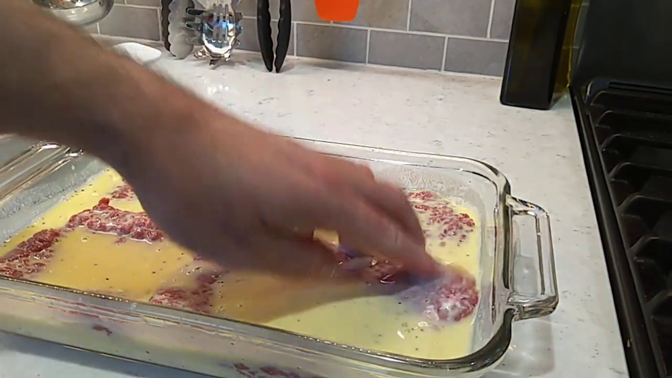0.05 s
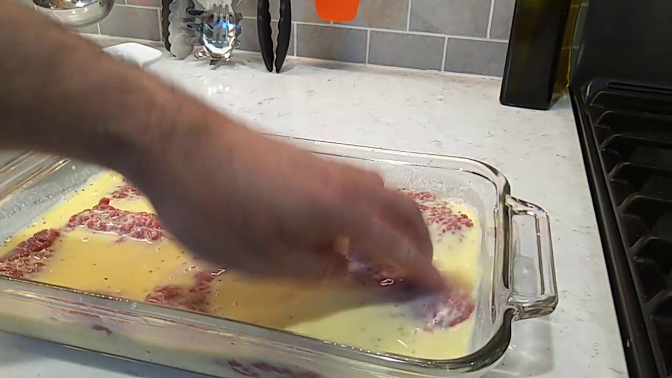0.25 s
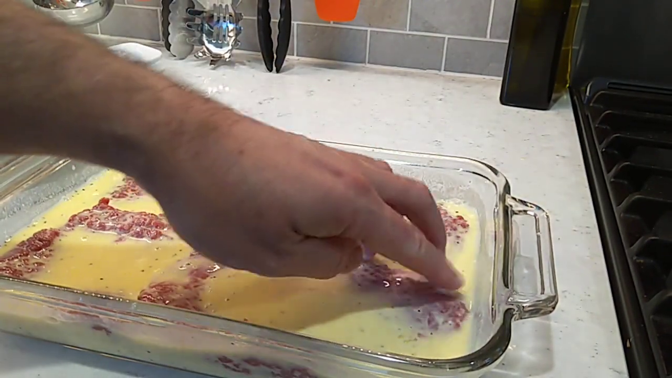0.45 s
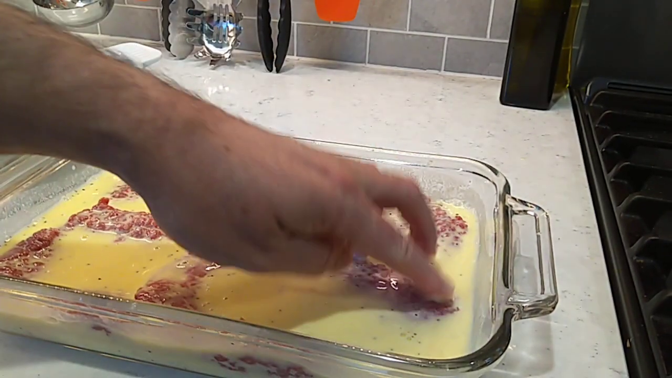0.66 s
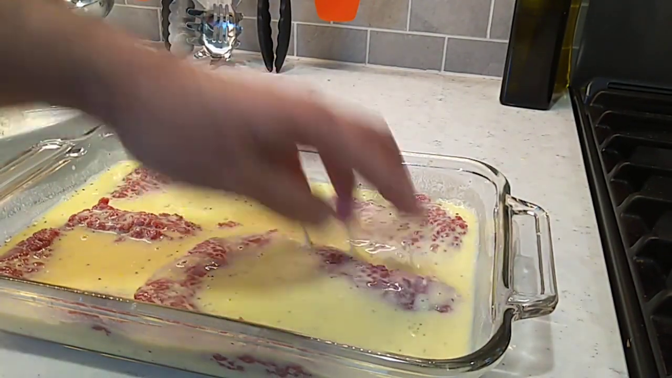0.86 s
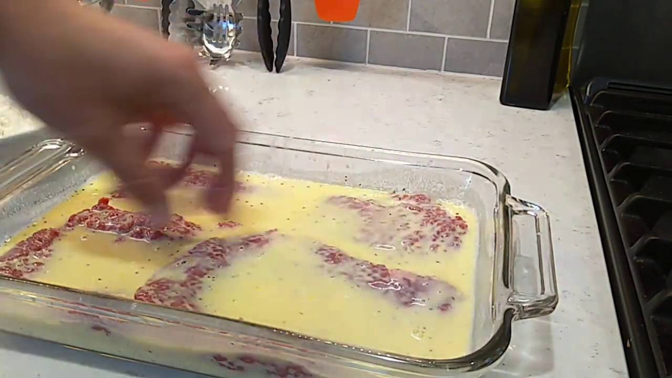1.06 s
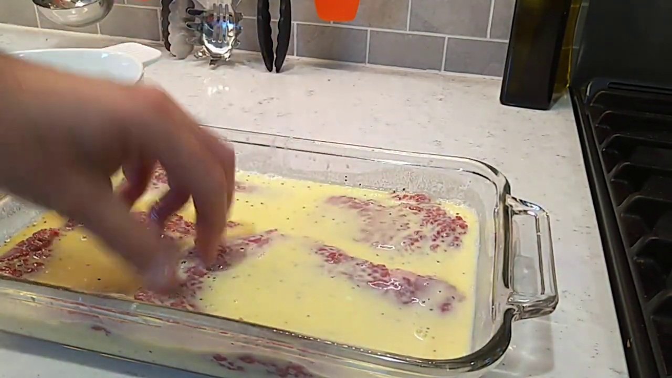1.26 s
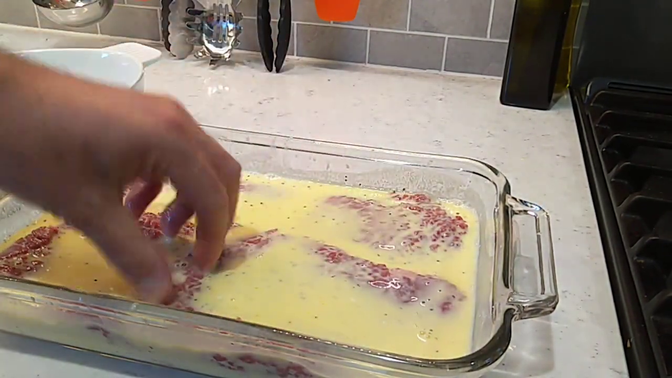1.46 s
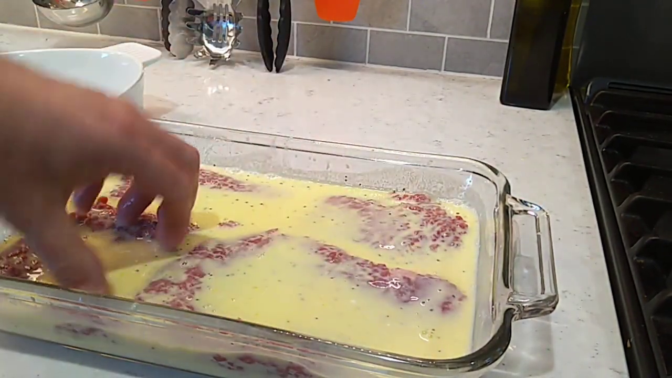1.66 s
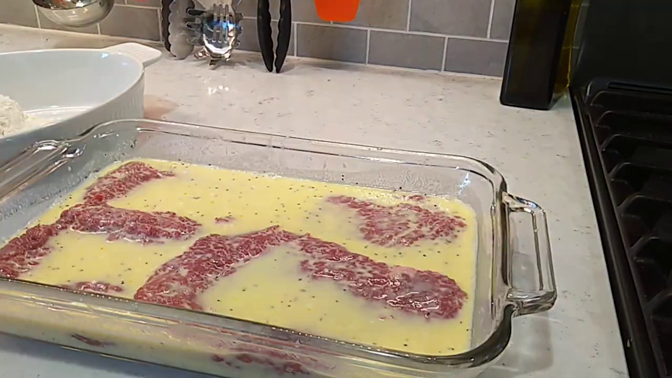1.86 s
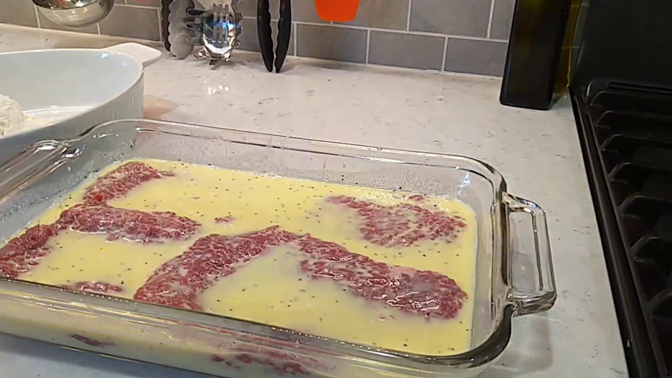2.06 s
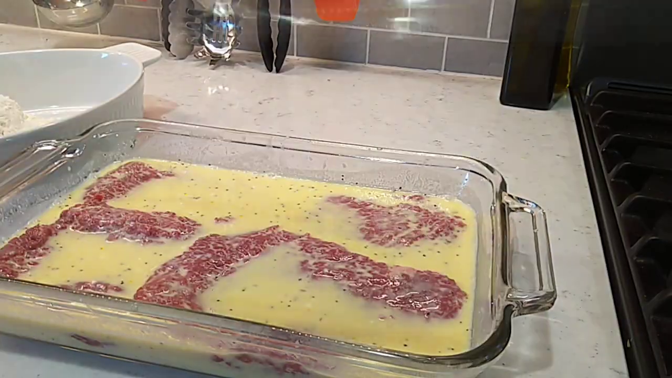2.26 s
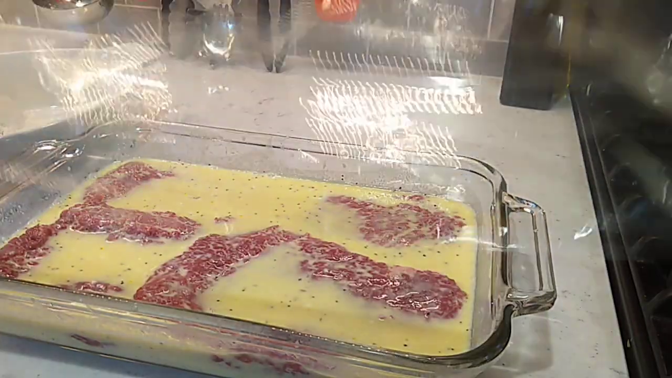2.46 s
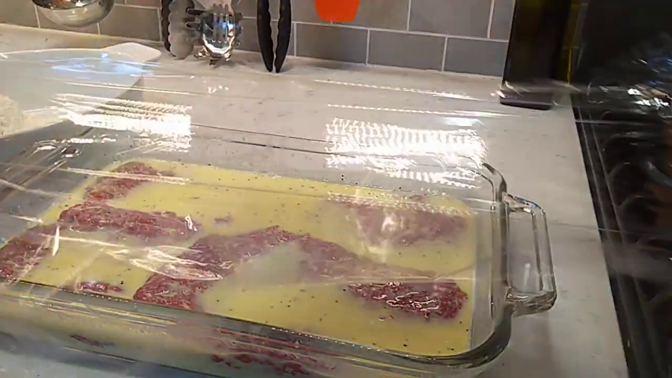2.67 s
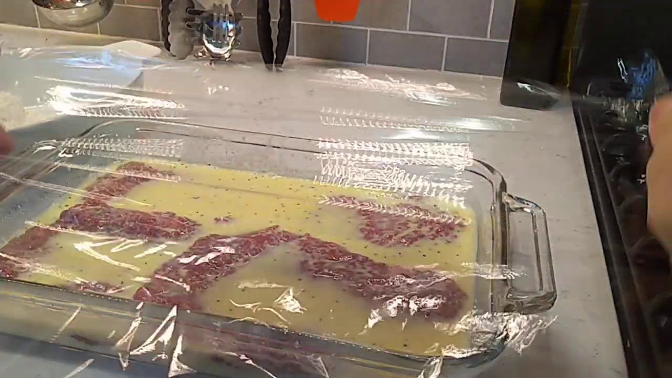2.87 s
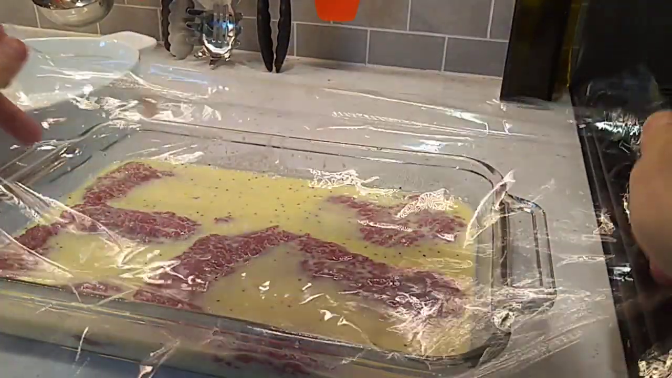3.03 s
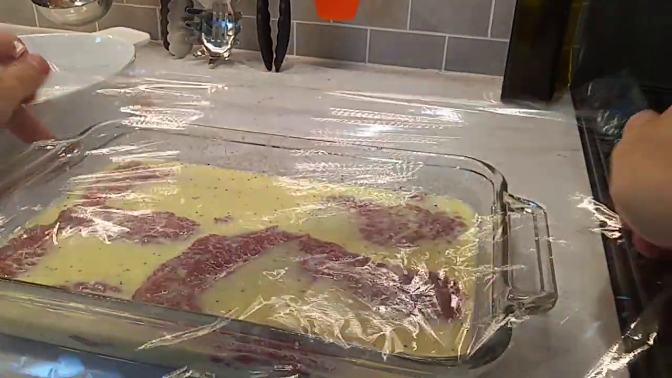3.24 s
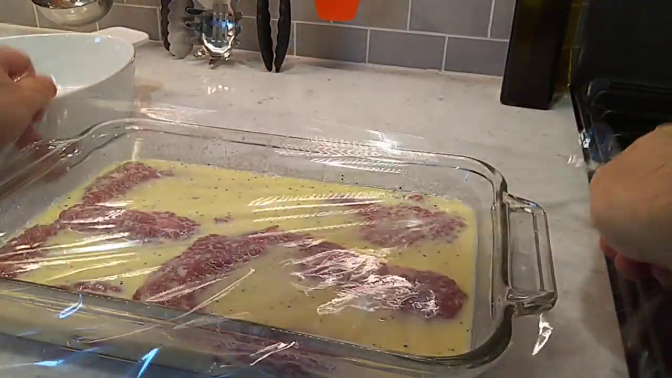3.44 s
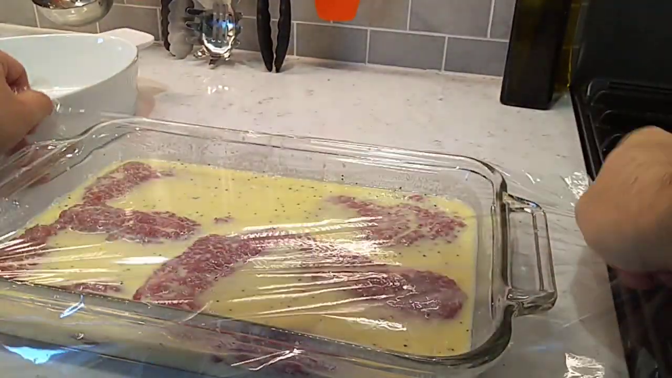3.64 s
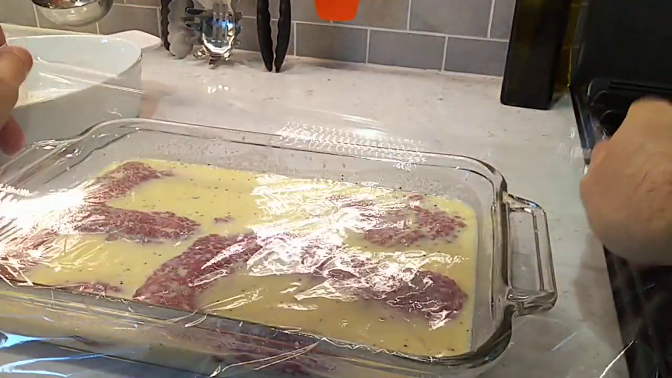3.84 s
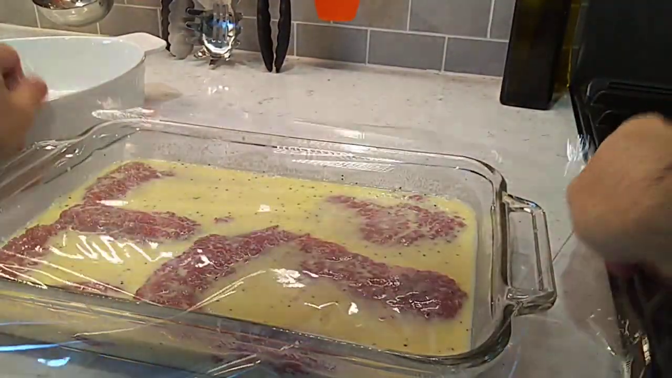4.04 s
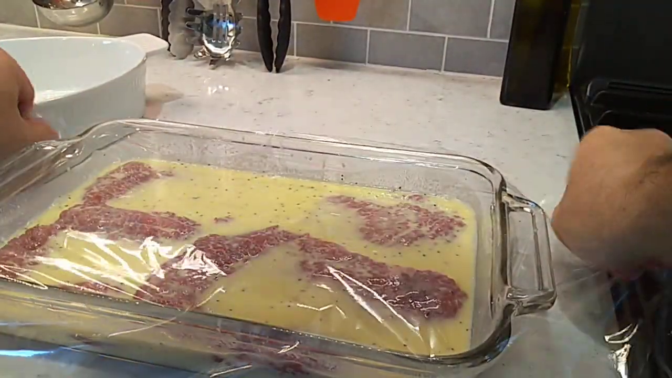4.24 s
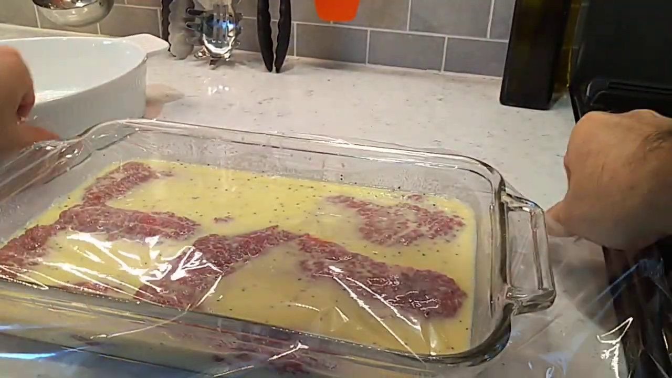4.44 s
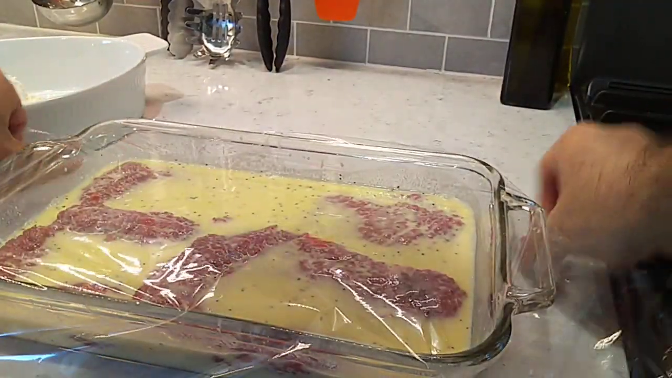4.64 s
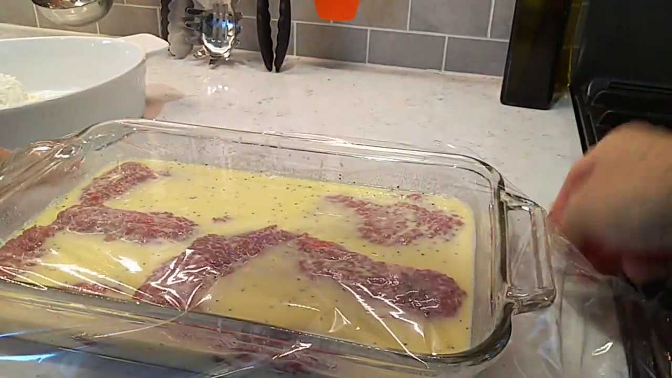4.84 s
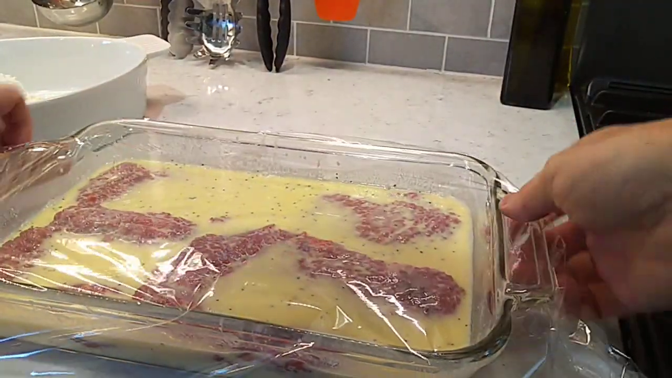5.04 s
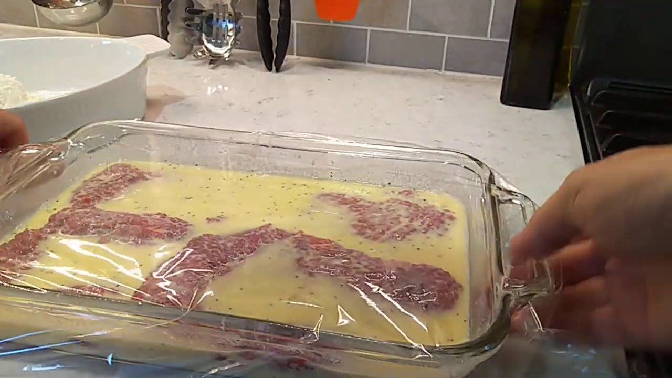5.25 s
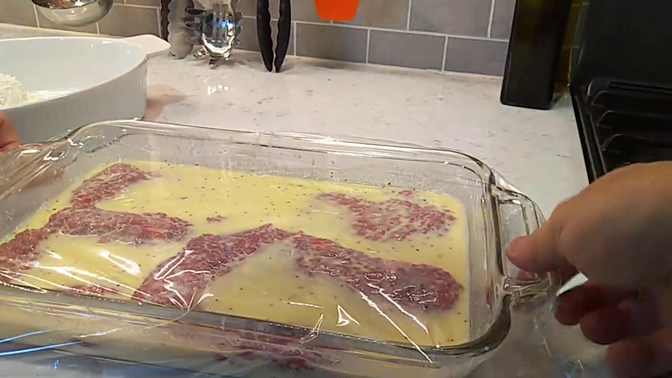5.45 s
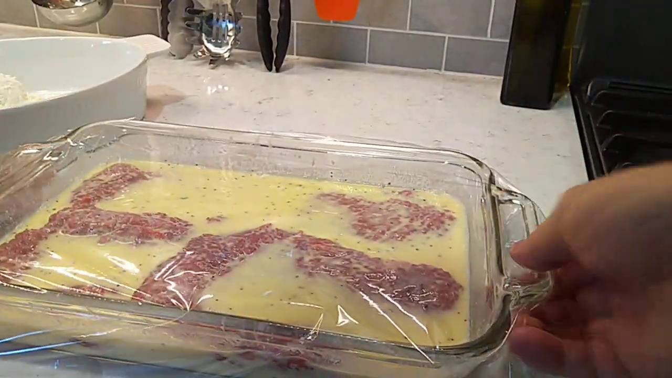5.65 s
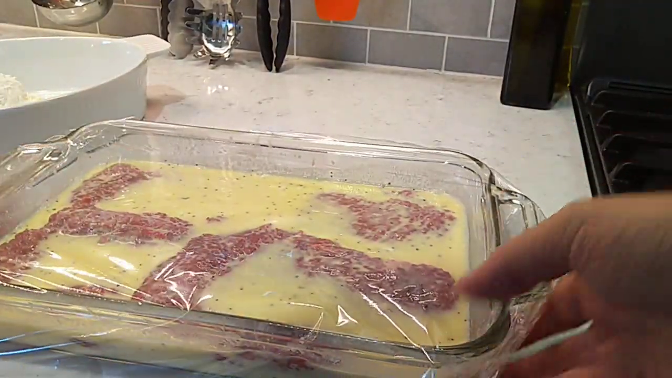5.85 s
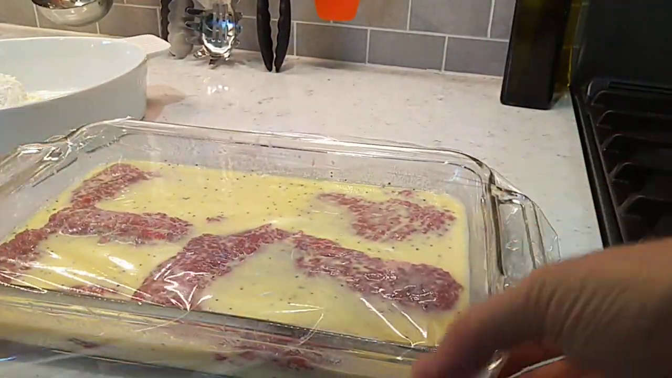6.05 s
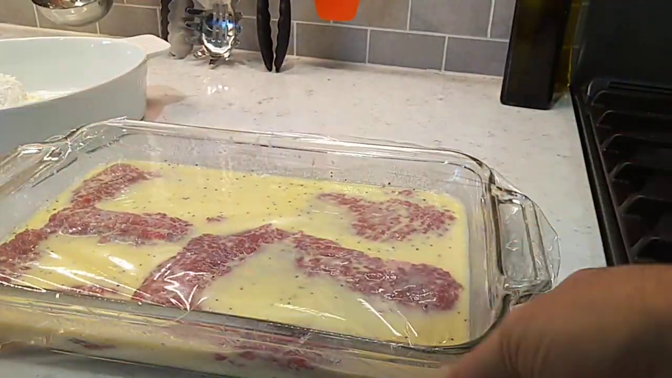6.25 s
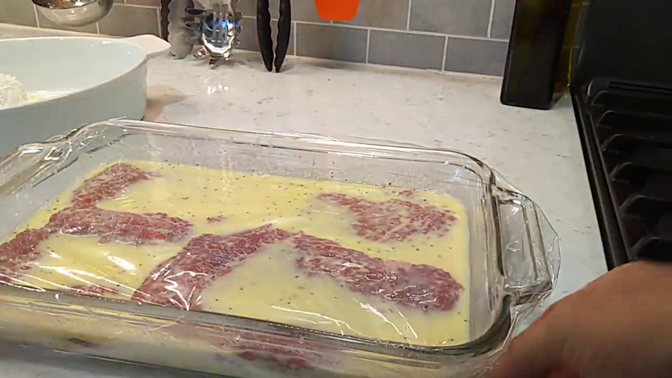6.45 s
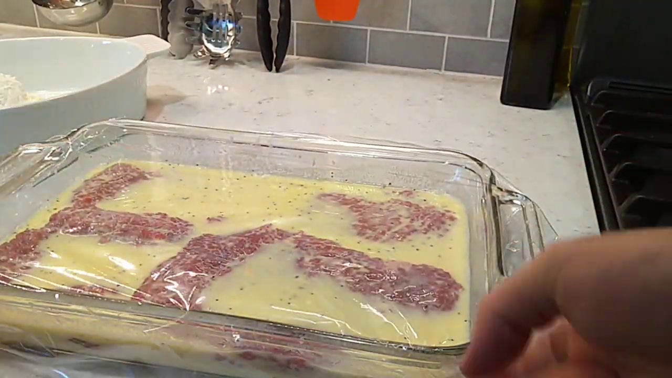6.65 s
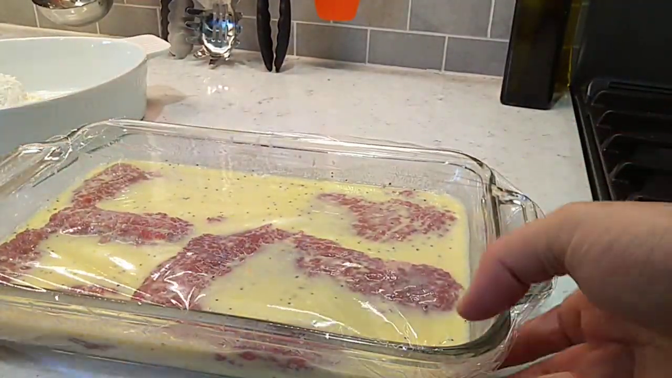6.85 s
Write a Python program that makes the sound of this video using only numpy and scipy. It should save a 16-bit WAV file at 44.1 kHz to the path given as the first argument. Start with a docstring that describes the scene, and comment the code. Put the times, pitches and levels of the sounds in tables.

```python
"""Cling film is pulled off its roll, torn, and smoothed over a glass dish on a kitchen counter.
The film crinkles in swarms of tiny clicks, snaps at single creases, whistles as a quick stick-slip while it
peels, and rubs over the rim. Before that, a finger presses meat into liquid: gliding tones make a thin wet
squeak, and short sinking tones make plops. Bumps are pushes of noise through the resonances of dish and
counter, the rim rings briefly, and a low mains hum, hiss and room noise lie underneath."""
import sys
import numpy as np
from scipy import signal
from scipy.fft import rfft, irfft, next_fast_len
from scipy.io import wavfile
from scipy.ndimage import uniform_filter1d, map_coordinates

SR = 44100
rng = np.random.default_rng(int(sys.argv[2]) if len(sys.argv) > 2 else 0)


def to_wav(s):
    """Save 16-bit WAV."""
    ch = np.atleast_2d(s).T  # columns
    pcm = np.round(np.clip(ch, -1, 1) * 32767)  # PCM
    wavfile.write(sys.argv[1], SR, pcm.astype(np.int16))


N = 304334
TOP_HZ = 16050  # upper limit of the sound

# colour of the film's fine wrinkles: pitch_hz, level_db
WRINKLE_COLOUR = [(2500, -81), (5000, -25.5), (8000, -13), (10500, -3.5), (12500, 2), (14500, 2),
                  (15800, -2), (17000, -99)]


def amp(db):
    """Turn decibels into gain."""
    return 10 ** (np.asarray(db) / 20)


def unit(x):
    """Scale x to an average (rms) level of 1."""
    return x / np.sqrt(np.mean(x ** 2) + 1e-20)


def along(points, hz):
    """Read a curve of (pitch in Hz, value) points, with pitch on a log axis."""
    point_hz, values = np.transpose(points)
    return np.interp(np.log(hz + 1), np.log(point_hz + 1), values)


def colour(points):
    """Make a filter response from (pitch in Hz, level in dB) points."""
    return lambda hz: amp(along(points, hz))


def curves(rows):
    """Give one value per sample for each column after the time."""
    seconds, *columns = np.transpose(rows)
    return [np.interp(np.arange(N) / SR, seconds, column) for column in columns]


def wobble(rate):
    """Draw a smooth random curve with this many random points a second."""
    points = rng.standard_normal(int(N * rate / SR) + 4)
    return map_coordinates(points, [np.arange(N) * rate / SR])


def filtered(x, response):
    """Filter x by a gain that depends on frequency."""
    size = next_fast_len(N + SR // 2)
    spectrum = rfft(x, size) * response(np.fft.rfftfreq(size, 1 / SR))
    return irfft(spectrum, size)[..., :N]


def resonances(modes):
    """Make the response of a body that rings at (pitch Hz, width Hz, level dB) modes, in alternating sign."""
    def mode(hz, centre, width, db):
        return amp(db) * 1j * hz * width / (centre * centre - hz * hz + 1j * hz * width)
    return lambda hz: sum((-1) ** k * mode(hz, *row) for k, row in enumerate(modes))


def noise(response, mono_hz=520):
    """Make coloured stereo noise of rms 1, alike in both ears only in the bass."""
    mid, side = filtered(rng.standard_normal((2, N)), response)
    side = filtered(side, lambda hz: 1 - 0.74 / (1 + (hz / mono_hz) ** 4))
    return unit(np.array([mid + side, mid - side]))


def add(track, sound, s):
    """Mix a sound into a track at time s."""
    part = track[..., max(round(s * SR), 0):][..., :sound.shape[-1]]
    part += sound[..., :part.shape[-1]]


def swell(s, db, length):
    """Follow one hand movement: the gain grows to its peak at s and dies away."""
    skew, power = 0.058, 2.06  # it dies a little slower than it grows; power 1 = pointed, 2 = rounded
    u = 2 * (np.arange(N) / SR - s) / length
    return amp(db) * np.exp(-np.abs(u / (1 + skew * np.sign(u))) ** power / 2)


def buckles(spectrum, rate, spread_db, clump_db, count=14):
    """Scatter tiny clicks over several patches of film, each with its own place and colour; rms 1."""
    out, t = np.zeros((2, N)), np.arange(SR // 400) / SR
    for place in np.linspace(-1, 1, count):
        size_db = spread_db * np.minimum(rng.standard_normal(N), np.pi)
        sizes = amp(size_db + 3.7 * wobble(14))  # the patches take turns
        happens = rng.random(N) < rate / count / SR
        clicks = happens * sizes * rng.choice([-1, 1], N)
        shape = unit(rng.standard_normal(len(t)) * np.exp(-t / 0.00027))
        patch = signal.oaconvolve(clicks, shape)[:N]
        lag = round(place * .00012 * SR)  # the nearer ear hears it sooner and louder
        out += [amp(2 * place) * np.roll(patch, -lag), amp(-2 * place) * np.roll(patch, lag)]
    return unit(filtered(out * amp(clump_db), colour(spectrum)))


def ticks(rate, centre_hz, cycles, spread_db):
    """Pop stray wrinkles one by one as short ringing tones, each at its own pitch and place; rms 1."""
    pan_db = 2  # gain in the nearer ear for a pop at the edge of the film
    out, t = np.zeros((2, N)), np.arange(SR // 250) / SR
    for when, pitch, size, place in rng.random((int(rate * N / SR), 4)):
        hz = min(centre_hz * 2 ** (np.sqrt(pitch) - 2 / 3), TOP_HZ)
        ring = np.sin(2 * np.pi * hz * t) * np.exp(-t * hz / cycles)
        pop = amp(spread_db * size ** 2) * hz / centre_hz * ring
        side = 2 * place - 1
        add(out[0], amp(pan_db * side) * pop, (when * N - 6 * side) / SR)
        add(out[1], amp(-pan_db * side) * pop, (when * N + 6 * side) / SR)
    return unit(out)


def crinkle(fine_db=-1.0, broad_db=-0.5):
    """Fine wrinkles fizz and pop, and broad folds crackle, with each stroke and faintly in between."""
    # pulls, presses and tucks of the film: peak_s, wrinkles_db (before fine_db), length_s,
    # folds_db (relative to the wrinkles, before broad_db)
    strokes = [(2.071, -49, 0.082, -7), (2.149, -54, 0.14, -2.5), (2.322, -35, 0.016, -18),
               (2.35, -40.5, 0.056, -14), (2.482, -53, 0.11, -8), (2.77, -50.5, 0.084, -9.5),
               (3.033, -46.5, 0.15, -13), (3.139, -39.5, 0.021, -7.5), (3.185, -41.5, 0.17, -13),
               (3.364, -42.5, 0.047, -11.5), (3.683, -43.5, 0.052, -20), (3.863, -39.5, 0.085, -9),
               (3.997, -44.5, 0.03, -4.5), (4.15, -46.5, 0.11, -11.5), (4.404, -53.5, 0.13, -8.5),
               (4.27, -45, 0.081, -12), (4.585, -45.5, 0.026, -11), (4.743, -47.5, 0.07, -10),
               (4.852, -41, 0.028, -28), (5.059, -40, 0.088, -9), (5.309, -36.5, 0.069, -10.5),
               (5.42, -44, 0.077, -7), (5.599, -39, 0.057, -9.5), (5.88, -35.5, 0.23, -10),
               (6.08, -34, 0.1, -14.5), (6.21, -34.5, 0.073, -13), (6.309, -34, 0.067, -10.5),
               (6.396, -32.5, 0.074, -10), (6.534, -38, 0.041, -12.5), (6.613, -36, 0.046, -12.5),
               (6.773, -38.5, 0.073, -12), (6.894, -33.5, 0.11, -13)]
    # the hands keep the film faintly astir: time_s, level_db (before stir_db)
    stirring = [(2.0, -51), (2.16, -59.5), (3.28, -48), (4.67, -51.5), (4.98, -46), (5.01, -40.5),
                (5.21, -40.5), (5.66, -41.5), (5.98, -45), (6.46, -32.5), (6.6, -47), (6.7, -49),
                (6.73, -45), (6.9, -48)]
    # colour of the broad folds: pitch_hz, level_db
    fold_colour = [(150, -25), (400, -8), (800, -9.5), (1100, -6), (1500, -7.5), (2600, -1.5), (3500, 1),
                   (4200, 2), (5100, -5), (6200, -1.5), (7200, -0.5), (10000, -8), (16000, -25)]
    grip_s = 2.0  # the film is picked up
    stir_db, stir_folds_db = -4.5, -13.5  # level of the stir; its folds relative to its wrinkles
    pop_db, pop_growth = -47.5, .5  # pops in the hardest stroke; they follow the strokes only partly (dB per dB)

    stir = amp(curves(stirring)[0] + stir_db) * (np.arange(N) / SR > grip_s)
    fine_power, broad_power = stir ** 2, (stir * amp(stir_folds_db)) ** 2
    for s, db, length, folds_db in strokes:
        power = swell(s, db, length) ** 2
        fine_power = fine_power + power
        broad_power = broad_power + power * amp(folds_db) ** 2
    clump_db = 1.6 * wobble(160)  # one buckle sets off its neighbours
    wrinkles = buckles(WRINKLE_COLOUR, rate=4200, spread_db=4.6, clump_db=clump_db)
    folds = buckles(fold_colour, rate=3500, spread_db=5, clump_db=clump_db)
    pop_gain = amp(pop_db) * (fine_power / fine_power.max()) ** (pop_growth / 2)
    pops = pop_gain * ticks(rate=110, centre_hz=12500, cycles=.8, spread_db=14)
    return amp(fine_db) * np.sqrt(fine_power) * wrinkles + pops + amp(broad_db) * np.sqrt(broad_power) * folds


def snaps(unlike=0.98, body_linger_s=0.0014):
    """A crease flips in about a millisecond: a bright crack, the ring of its patch and a slower, duller body."""
    # creases that snap: start_s, decay_s, treble_db, middle_db, middle_pitch_hz, body_db, left_over_right_db;
    # the three part levels come before snap_db
    creases = [(1.9988, 0.0027, -45.5, -59, 4200, -65, 7.5), (2.0378, 0.0028, -33.5, -38, 3080, -42, 5.5),
               (2.0453, 0.0032, -50.5, -55, 4000, -52, 4), (2.0537, 0.003, -53.5, -47, 4820, -58, 0),
               (2.1433, 0.0019, -43, -49, 4400, -56, 6.5), (2.2287, 0.0008, -45, -70, 3600, -66, 9),
               (2.3138, 0.00093, -20, -31, 5240, -43.5, -1.5), (2.3314, 0.0018, -32.5, -38, 5400, -43, 3.5),
               (2.3658, 0.0015, -42.5, -42, 5800, -60, 8.5), (2.3707, 0.0018, -43, -40, 6000, -61, 8),
               (2.4643, 0.0028, -44, -59, 4400, -70, 0), (2.6464, 0.0008, -46.5, -52, 7200, -69, 7.5),
               (2.6562, 0.001, -36.5, -46, 6000, -69, 3.5), (2.764, 0.0013, -45.0, -60, 5000, -68, -3),
               (2.7917, 0.0033, -37, -45.5, 4800, -52.5, 4), (3.009, 0.001, -38, -46, 6400, -60, 1.5),
               (3.0464, 0.0022, -35, -49, 6400, -54, 1), (3.0768, 0.0012, -32, -62, 5000, -61, 6),
               (3.373, 0.0029, -35, -62, 2800, -56, 1), (3.5688, 0.0017, -40.5, -51, 7160, -66, 4),
               (3.6567, 0.0007, -37, -58, 5600, -64, -3.5), (3.676, 0.0011, -46, -62, 5200, -58, -8),
               (3.7316, 0.001, -21, -33.5, 3640, -41, -4.5), (3.8005, 0.0012, -38, -61, 4800, -56, 2),
               (3.814, 0.0022, -21.5, -31.5, 2800, -45.5, -1.5), (3.8232, 0.0005, -40.0, -43, 2400, -37, 1),
               (3.832, 0.0022, -19, -27.5, 3200, -28, 0.5), (3.8872, 0.0026, -32, -33.5, 2980, -39, 2.5),
               (3.8904, 0.0021, -23.5, -35.5, 4000, -38, 3.5), (3.8987, 0.0019, -38, -51, 3600, -53, 6),
               (4.0083, 0.003, -34, -43, 3200, -45, 4.5), (4.0746, 0.0035, -43, -56, 2400, -66, -2),
               (4.0854, 0.0009, -39, -52, 7200, -68, -3), (4.232, 0.0017, -39.5, -42.5, 5200, -51, 1),
               (4.2459, 0.0012, -34, -49, 3600, -65, -3), (4.2518, 0.0025, -28, -39.5, 3000, -57, -1),
               (4.2855, 0.0034, -36, -43, 6600, -47.5, 5.5), (4.2996, 0.0012, -38, -48, 2800, -63, -7),
               (4.315, 0.0013, -23, -33, 2370, -49, -1.5), (4.321, 0.002, -40.5, -48, 3020, -52, 3),
               (4.4806, 0.0011, -34, -55, 2780, -61, -8), (4.5593, 0.0018, -45.0, -63, 4600, -55, 2),
               (4.6854, 0.0012, -29.5, -45.5, 2600, -38.5, -2.5),
               (4.8278, 0.0012, -20.0, -28.5, 4400, -48, 0), (4.8893, 0.0012, -45, -43, 7200, -64, 5.5),
               (4.9524, 0.0017, -40, -59, 3400, -62, 6), (5.001, 0.001, -43, -58, 3200, -56, -2),
               (5.0543, 0.0033, -31.0, -61, 3600, -49, -5), (5.0802, 0.0013, -31.5, -64, 3400, -50.5, 3.5),
               (5.1032, 0.0009, -34, -55, 2400, -59, -5), (5.1752, 0.0008, -39, -63, 3200, -61, 6),
               (5.2773, 0.0018, -34, -53, 4600, -53, 2), (5.3083, 0.0011, -34, -46, 6800, -55, 4),
               (5.3416, 0.001, -40, -47, 2400, -53, 2), (5.3601, 0.0012, -30, -46, 2600, -54, 3.5),
               (5.4427, 0.0013, -37.0, -50, 3800, -56, -3), (5.6195, 0.0023, -32, -59, 2400, -57, -2),
               (5.6279, 0.0018, -36.5, -60, 2400, -60, -3), (5.7127, 0.0014, -34, -53, 4200, -55, -1),
               (5.9083, 0.0024, -29, -46, 3600, -53, 1), (5.9405, 0.0007, -39, -46, 3800, -64, -2),
               (5.9674, 0.0016, -24.5, -41, 5000, -50, -1), (5.9707, 0.0035, -32, -42, 3200, -64, 8.5),
               (5.9807, 0.0011, -30.0, -40, 3000, -68, -1.5), (5.9985, 0.0009, -35.0, -53, 3400, -70, 0),
               (6.0337, 0.0009, -41, -50, 3800, -70, -3), (6.0756, 0.001, -35, -44, 3800, -67, 5),
               (6.1133, 0.00046, -33.0, -55, 2600, -63, 7), (6.3136, 0.0011, -34, -51, 3000, -57, 2),
               (6.327, 0.0014, -36, -54, 3400, -56, -3), (6.3356, 0.0005, -29, -51, 4000, -61, 5),
               (6.35, 0.0014, -27, -42, 2390, -55, 3.5), (6.3658, 0.0016, -28, -42, 2400, -57, 4),
               (6.3879, 0.0019, -22.0, -35.5, 3200, -52, 3.5), (6.4095, 0.0026, -23, -37.5, 3200, -57, 4),
               (6.543, 0.00093, -22.5, -44, 3420, -65, 6), (6.5573, 0.0011, -27, -46, 2800, -63, 5),
               (6.5826, 0.0016, -29, -55, 4000, -61, 1.5), (6.59, 0.0027, -26, -41.5, 2600, -48, 0.5),
               (6.6121, 0.0015, -32.0, -58, 4800, -49.5, -3), (6.6423, 0.0008, -37, -57, 4400, -62, 1),
               (6.723, 0.0016, -40, -52, 3600, -67, 2.5)]
    # colour of a snap's middle, before it is shifted in pitch: pitch_hz, level_db
    middle_colour = [(1000, -31), (2400, -9), (3800, 0), (6000, -3), (9000, -13), (16000, -38)]
    # colour of a snap's body: pitch_hz, level_db
    body_colour = [(100, -24), (400, -5), (700, -1.5), (1050, 1.5), (1700, -5), (2400, -9), (4500, -24),
                   (9000, -55)]
    unshifted_hz = 4000  # middle pitch at which the middle's colour stays unshifted
    snap_db, span_s = -2, .004  # overall level; time over which a part's level is averaged
    rise_s = .0001  # time a crease takes to give way
    flip_db, flip_s = 9, .0003  # the flip stands out above the shiver that follows; its decay time

    out, t = np.zeros((2, N)), np.arange(SR // 25) / SR
    hz, start = np.fft.rfftfreq(len(t), 1 / SR), len(t) // 4
    for s, life, treble_db, middle_db, middle_hz, body_db, pan_db in creases:
        shiver = rng.standard_normal(len(t)) + unlike * rng.standard_normal((2, len(t)))
        shiver = shiver * (1 + amp(flip_db) * np.exp(-t / flip_s))
        parts = ((along(WRINKLE_COLOUR, hz), treble_db, life),
                 (along(middle_colour, hz * unshifted_hz / middle_hz), middle_db, life),
                 (along(body_colour, hz), body_db, life + body_linger_s))
        crack = 0
        for colour_db, db, decay in parts:
            envelope = (1 - np.exp(-t / rise_s)) * np.exp(-t / decay)
            burst = rfft(np.roll(shiver * envelope, start, axis=1))
            even = burst / uniform_filter1d(np.abs(burst), size=24, axis=1)  # a crack excites all pitches alike
            part = irfft(even * amp(colour_db), len(t))
            crack = crack + amp(db) * part / np.linalg.norm(part, axis=1, keepdims=True)
        ear_gains = unit(amp([[pan_db / 2], [-pan_db / 2]]))
        crack = crack * amp(snap_db) * np.sqrt(span_s * SR) * ear_gains
        lead = np.clip(pan_db, -10, 10) / 2  # the nearer ear hears it a few samples sooner
        add(out[0], crack[0], s - (start + lead) / SR)
        add(out[1], crack[1], s - (start - lead) / SR)
    return out


def whistle(hz, strands, waver, rough, broken_db):
    """Very fast stick-slip, rms 1: a few strands sing side by side at different rates, catching and letting go."""
    out = np.zeros((2, N))
    glide = uniform_filter1d(hz, SR // 40)  # the hand turns smoothly
    for ratio, db in strands:
        pitch = glide * ratio * (1 + waver * wobble(30) + rough * wobble(700))
        phase = 2 * np.pi * np.cumsum(pitch) / SR
        grip = amp(db + broken_db * np.tanh(wobble(35)))
        out += [grip * np.sin(phase + wobble(36)) for ear in range(2)]
    return unit(out)


def peel():
    """The film whistles off the roll by stick-slip, higher as the pull gets faster."""
    # film peeling off the roll: time_s, slip_rate_hz, level_db
    pull = [(2.48, 10900, -57), (2.54, 11600, -55), (2.61, 10500, -60), (2.665, 11500, -53),
            (2.75, 10400, -61), (2.79, 11100, -54), (2.88, 11050, -55), (2.95, 11800, -52),
            (3.03, 11200, -53), (3.09, 12350, -48), (3.14, 12100, -50), (3.27, 13800, -50.5),
            (3.35, 14300, -50.5), (3.47, 13650, -52), (3.53, 12750, -51), (3.58, 11400, -52),
            (3.67, 10100, -58)]
    # strands of film that sing together: rate_ratio (to the slip rate), level_db (relative)
    peel_strands = [(.8, -15), (.87, -13), (.94, -11), (1, 0), (1.08, -1), (1.17, -13)]
    fade_s = .04  # the whistle fades in and out
    hz, db = curves(pull)
    t = np.arange(N) / SR
    pulling = np.clip(np.minimum(t - pull[0][0], pull[-1][0] - t) / fade_s, 0, 1)
    return pulling * amp(db) * whistle(hz, peel_strands, waver=.004, rough=.016, broken_db=5)


def drag(judder_db=3, catch_db=3):
    """The film rubs unevenly over the rim of the dish as it is drawn across: coloured noise with a rough level."""
    # colour of the rubbing: pitch_hz, level_db
    rub_colour = [(200, -16), (410, 3.5), (750, -8), (1050, -1), (1500, -2), (2000, -6), (2900, 0.5),
                  (4000, -7), (7000, -25)]
    unevenness = amp(judder_db * wobble(120) + catch_db * wobble(28))
    rub = unit(noise(colour(rub_colour)) * unevenness)
    return swell(s=3.05, db=-56, length=0.18) * rub


def squeak():
    """Each sliding fingertip gives a thin, broken wet squeak by stick-slip."""
    # slides of the finger, one list each: time_s, pitch_hz, level_db (before squeak_db)
    slides = [
        [(.08, 7500, -95), (.17, 7900, -77), (.23, 8100, -83), (.28, 9050, -71), (.34, 8850, -77),
         (.39, 9400, -81), (.44, 9900, -70), (.5, 9500, -79), (.575, 9950, -66), (.62, 10600, -79),
         (.66, 10250, -71), (.72, 10400, -70), (.79, 10600, -100)],
        [(.06, 10250, -84), (.17, 10450, -78), (.22, 9950, -79), (.3, 10950, -78), (.34, 10250, -75),
         (.42, 10550, -75), (.5, 10350, -78), (.6, 10100, -90)],
    ]
    # partials of a squeak: pitch_ratio, level_db (relative)
    squeak_strands = [(.86, -10), (1, 0), (1.3, -11)]
    squeak_db = -2.5  # overall level
    t, out = np.arange(N) / SR, 0
    for slide in slides:
        hz, db = curves(slide)
        touching = (t > slide[0][0]) * (t < slide[-1][0])
        tone = whistle(hz, squeak_strands, waver=.005, rough=.01, broken_db=7)
        out = out + touching * amp(db + squeak_db) * tone
    return out


def plops(splash_db=-1):
    """Each small pocket in the liquid rings briefly, sinking in pitch, in a soft splash of noise."""
    # the finger leaves the liquid: start_s, level_db, starting_pitch_hz
    pockets = [(.861, -62.5, 1250), (.887, -69, 800), (.91, -67.5, 720), (.929, -70, 1200)]
    life_s, sag_octaves_per_s, splash_life_s = .007, 36, .015
    out, t = np.zeros((2, N)), np.arange(SR // 8) / SR
    wet = signal.butter(2, (450, 1500), "band", fs=SR, output="sos")
    for s, db, hz in pockets:
        phase = 2 * np.pi * np.cumsum(hz * 2 ** (-sag_octaves_per_s * t)) / SR
        u = 2 * t / life_s
        ring = u * np.exp(1 - u) * np.sin(phase)
        splash = unit(signal.sosfilt(wet, rng.standard_normal((2, len(t))))) * np.exp(-t / splash_life_s)
        add(out, amp(db) * (ring + amp(splash_db) * splash), s)
    return out


def bumps():
    """Soft, scuffing contacts sound the dish and the counter under it; the softer the touch, the duller."""
    # soft bumps of hands and box: start_s, level_db, decay_s, dull_above_hz, deep_thud_db (relative)
    contacts = [(2.04, -48.5, 0.032, 2500, -19), (2.479, -47, 0.0058, 2500, -12),
                (2.905, -51, 0.27, 670, -36), (2.938, -49, 0.0088, 1800, -20), (3.812, -41, 0.04, 330, -16),
                (3.888, -54, 0.1, 910, -16), (3.999, -53, 0.0099, 2500, 9), (4.85, -48, 0.037, 274, -1),
                (5.51, -48, 0.056, 650, -18), (5.553, -46, 0.017, 348, -1), (5.77, -52, 0.038, 1220, -8)]
    # resonances of the dish: pitch_hz, width_hz, level_db
    dish_modes = [(178, 3.9, -1), (236.4, 16, 0.5), (315, 23, -4.5), (438, 72, -4.5), (625, 150, -12),
                  (782, 45, -3), (1006, 180, -8), (1640, 2300, -17)]
    # resonances of the counter, before the response is squared: pitch_hz, width_hz, level_db
    counter_modes = [(53.3, 8.4, 3.5), (91.5, 26, 11)]
    rise_share = 0.073  # a contact builds up in this share of its decay time
    out, t = np.zeros((2, N)), np.arange(SR) / SR
    for s, db, life, dull_hz, thud_db in contacts:
        push = (1 - np.exp(-t / (rise_share * life))) * np.exp(-t / life)
        soften = signal.butter(2, min(dull_hz, SR / 4), fs=SR, output="sos")
        body = unit(signal.sosfilt(soften, noise(resonances(dish_modes))[:, :SR]))
        deep = noise(lambda hz: resonances(counter_modes)(hz) ** 2)[:, :SR]
        add(out, amp(db) * push / push.max() * (body + amp(thud_db) * deep), s)
    return out


def rim():
    """The glass sings one short, damped note when the taut film catches on its edge."""
    # catches of the film on the rim: start_s, level_db
    catches = [(2.941, -56), (5.503, -49.5)]
    rim_hz, rise_s, life_s = 790, 0.0072, 0.033
    out, t = np.zeros((2, N)), np.arange(SR // 4) / SR
    envelope = (1 - np.exp(-t / rise_s)) * np.exp(-t / life_s)
    for s, db in catches:
        phase = 2 * np.pi * rim_hz * t + rng.standard_normal((2, 1)) / 2
        add(out, amp(db) * envelope / envelope.max() * np.sin(phase), s)
    return out


def background(air_db=-62.0, hum_db=-1):
    """Mains hum is a set of wavering tones, hiss is faint noise; low room noise comes up as the film is picked up."""
    # tones of the hum: pitch_hz, level_db (before hum_db)
    hum_tones = [(59.2, -70.5), (207, -69.5), (240, -89), (355.3, -79), (710.6, -87.5), (1130, -89.5),
                 (1190, -88.5)]
    # colour of the steady hiss: pitch_hz, level_db
    air_colour = [(15, -59), (25, -58), (42, -11), (64, 1.5), (87, -10.5), (130, -12), (149, -16),
                  (206, -6), (263, -14.5), (451, -22.5), (695, -27), (1290, -33.5), (3720, -32),
                  (4500, -34), (9000, -33), (12800, -27.5), (16000, -32)]
    # colour of the low room noise: pitch_hz, level_db
    low_colour = [(50, -34), (100, 5), (150, -6), (220, 1.5), (330, 3.5), (500, -5.5), (1000, -13.5),
                  (2500, -18.5), (6000, -41)]
    # level of the low room noise: time_s, level_db
    low_level = [(0, -71), (1.96, -74.5), (2.08, -61.5), (4, -58), (6.9, -59.5)]
    t = np.arange(N) / SR
    hum = 0
    for hz, db in hum_tones:
        level = amp(db + hum_db + wobble(3.08)) * np.sqrt(2)
        hum = hum + level * np.sin(2 * np.pi * hz * t + hz / 300 * wobble(5.4))
    air = amp(air_db) * noise(colour(air_colour))
    low = amp(curves(low_level)[0]) * noise(colour(low_colour))
    left_db = [(60, -2.0), (130, 1.5), (250, 1.0), (500, 2.5), (1000, 1)]  # pitch_hz, gain_db; right is opposite
    return filtered(hum + air + low, lambda hz: amp(along(left_db, hz) * np.array([[1], [-1]])))


def kitchen(x, near_db=-7, near_t60=0.027, tail_db=-9):
    """Counter and tiles answer at once, then the room rings briefly; the echoes shift as the hands move the film."""
    # time the room takes to fade by 60 dB: pitch_hz, fade_s
    room_fade = [(200, 0.088), (900, 0.34), (2500, 0.22), (6000, 0.23), (14000, 0.094)]
    out, hop = x.copy(), SR // 8  # fresh echoes every eighth of a second
    for start in range(0, N, hop):
        hz, t, spectrum = signal.stft(rng.standard_normal((2, SR // 4)), SR, nperseg=256)
        fading = spectrum * amp(-60 * t / along(room_fade, hz)[:, None])
        tail = signal.istft(fading, SR, nperseg=256)[1]
        t = np.arange(tail.shape[1]) / SR
        sparse = rng.standard_normal(tail.shape) * (rng.random(tail.shape) < .2)
        near = sparse * amp(-60 * t / near_t60) * (t > .0007)
        tail = tail * (t > .004)
        answer = 0
        for db, echo in ((near_db, near), (tail_db, tail)):
            answer = answer + amp(db) * echo / np.linalg.norm(echo, axis=1, keepdims=True)
        add(out, signal.fftconvolve(x[:, start:start + hop], answer, axes=1), start / SR)
    return out


def scene():
    """Put film and finger in the echoing kitchen, then add bumps, rim and background without echo."""
    echoing = snaps() + crinkle() + peel() + drag() + squeak() + plops()
    return kitchen(echoing) + bumps() + rim() + background()


def record(dry):
    """Cut the treble off steeply above the upper limit."""
    return filtered(dry, lambda hz: 1 / np.sqrt(1 + (hz / TOP_HZ) ** 120))


dry = scene()
out = record(dry)
to_wav(out)
```